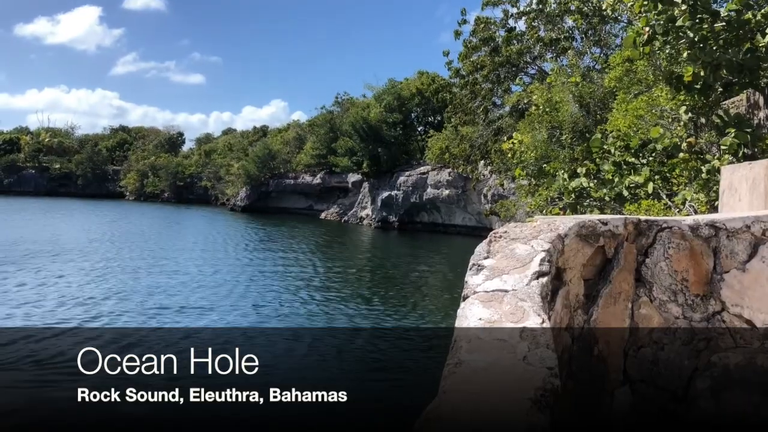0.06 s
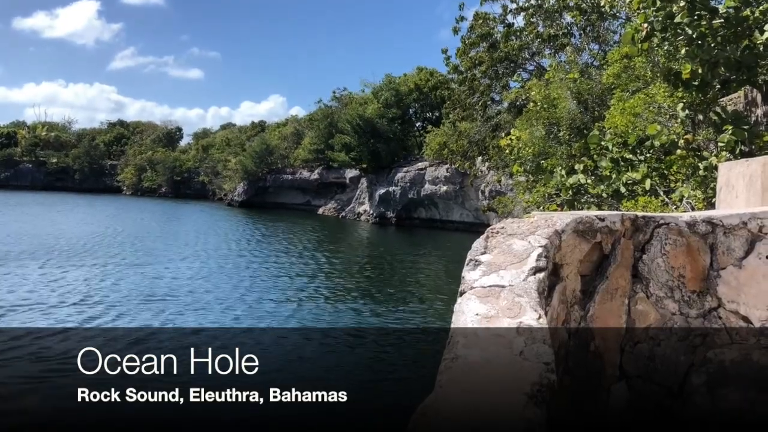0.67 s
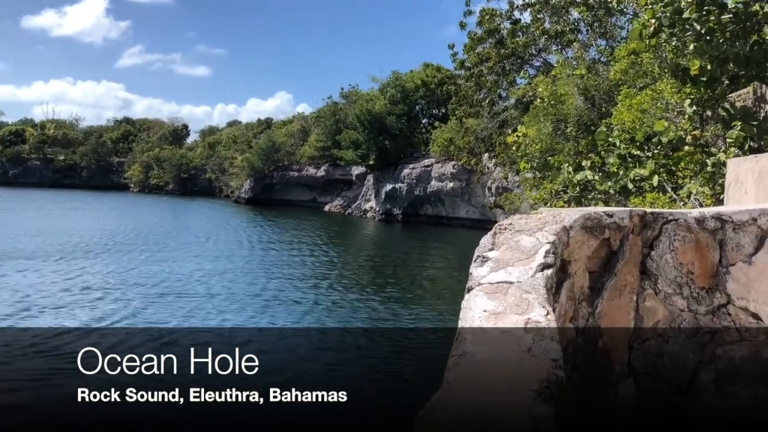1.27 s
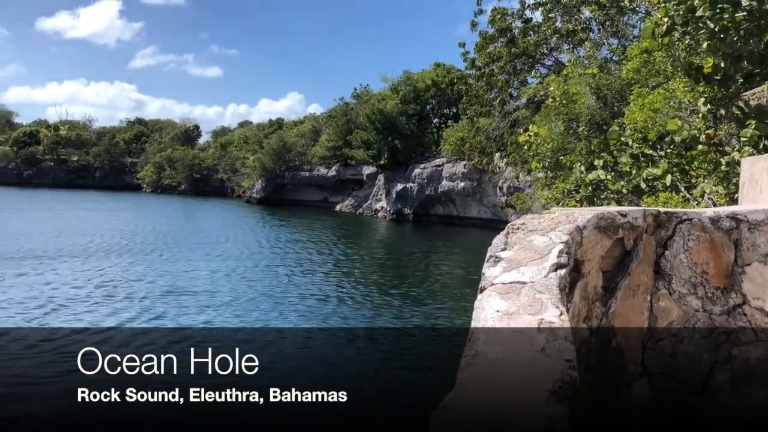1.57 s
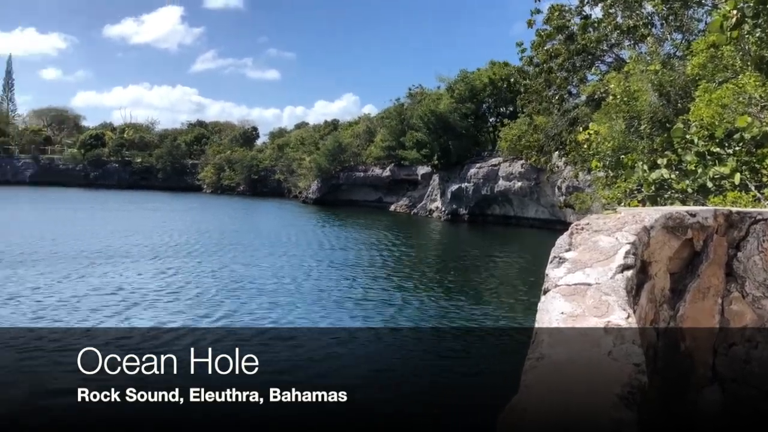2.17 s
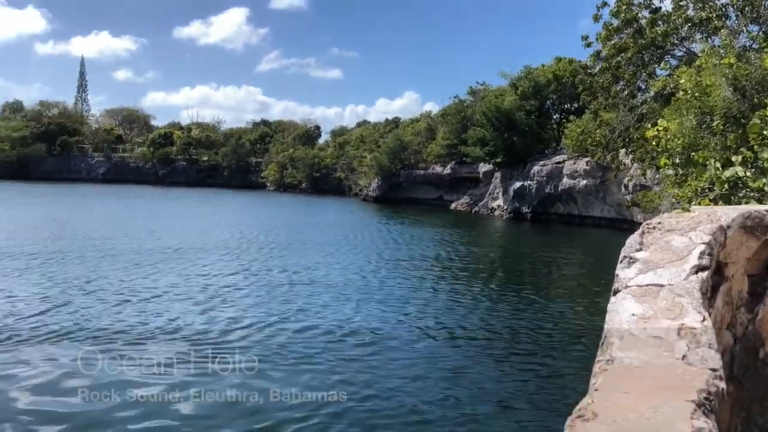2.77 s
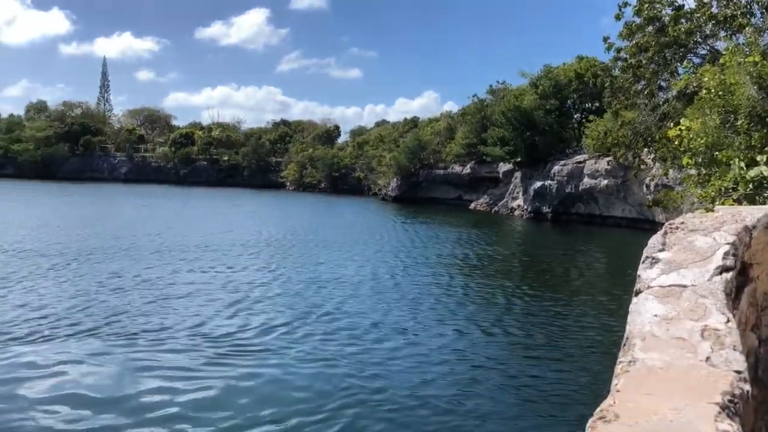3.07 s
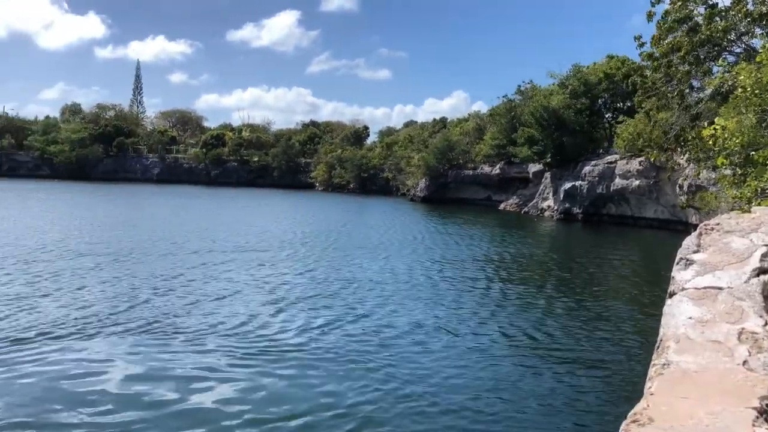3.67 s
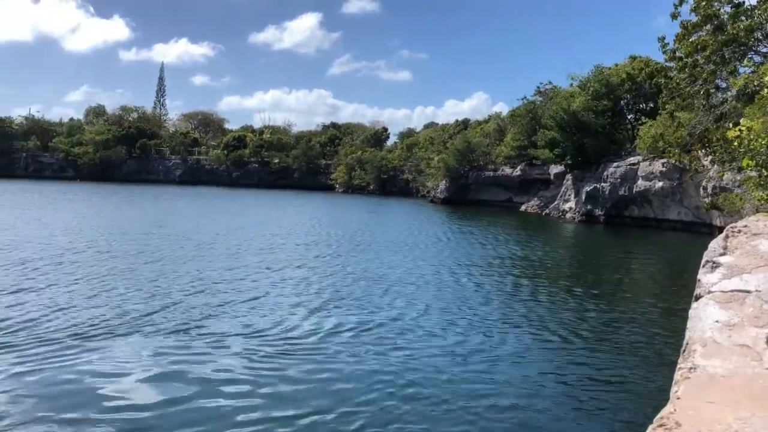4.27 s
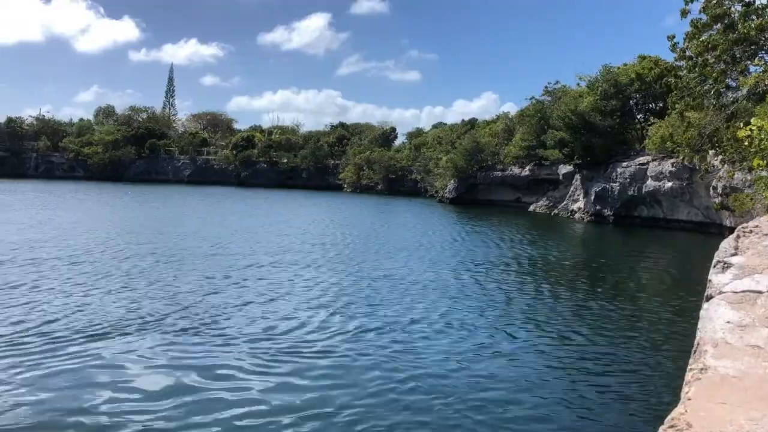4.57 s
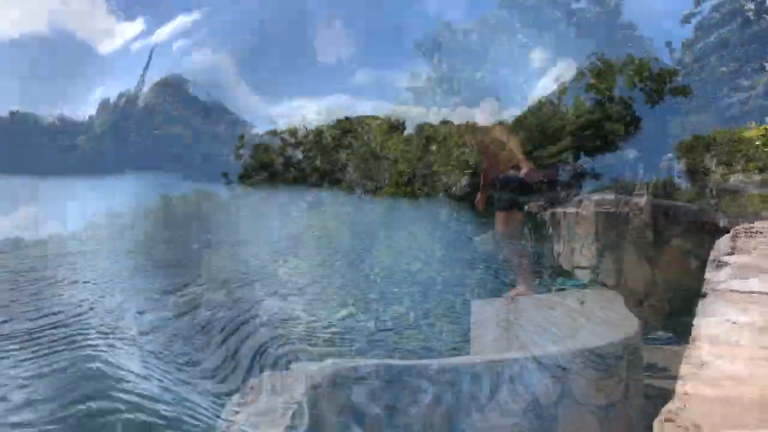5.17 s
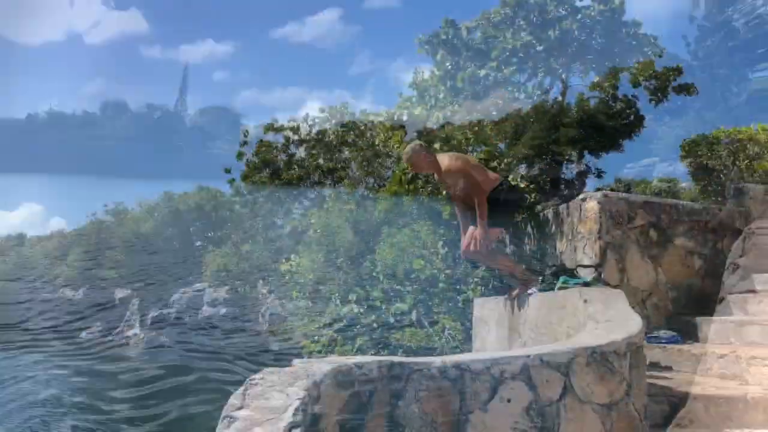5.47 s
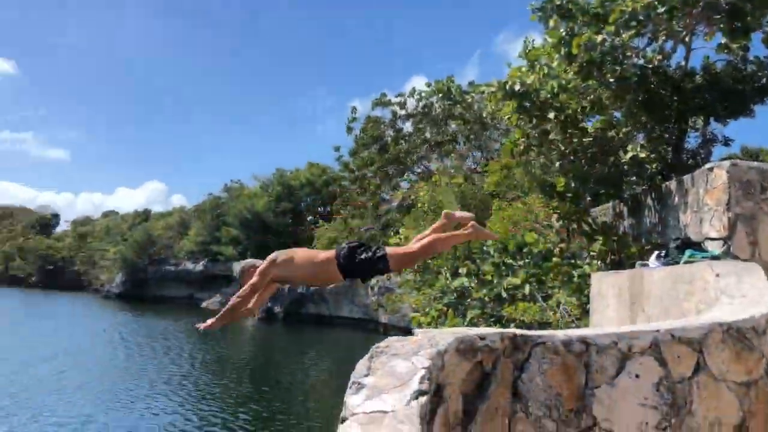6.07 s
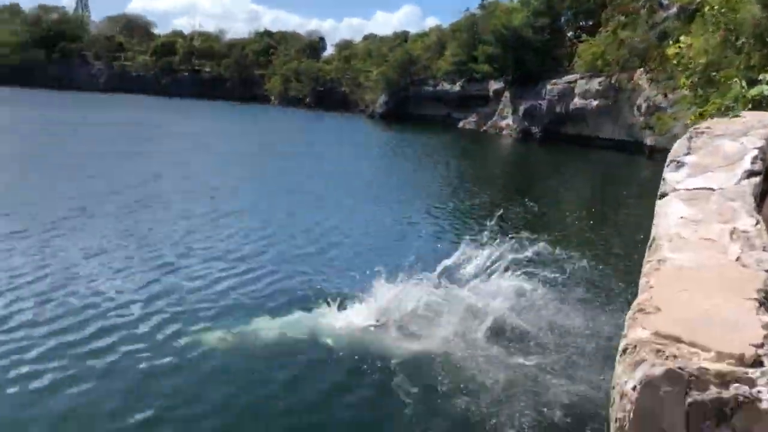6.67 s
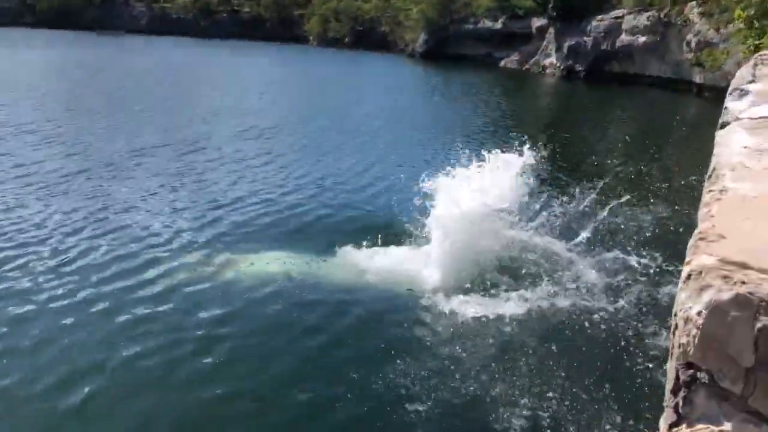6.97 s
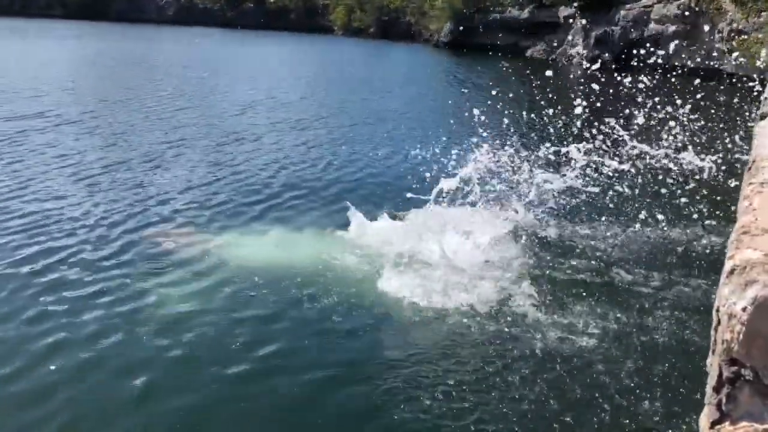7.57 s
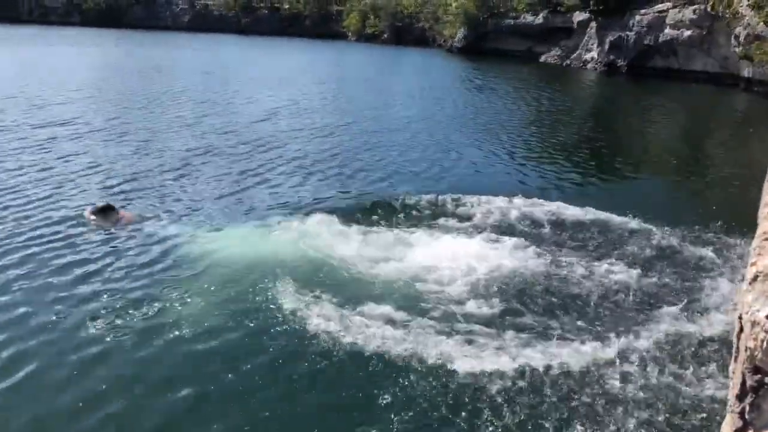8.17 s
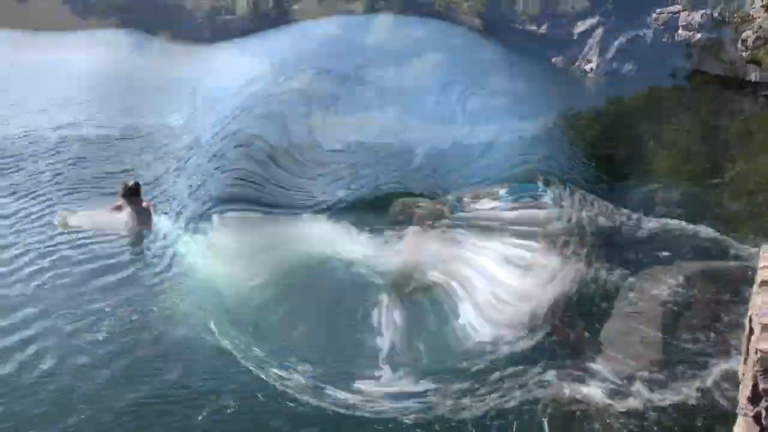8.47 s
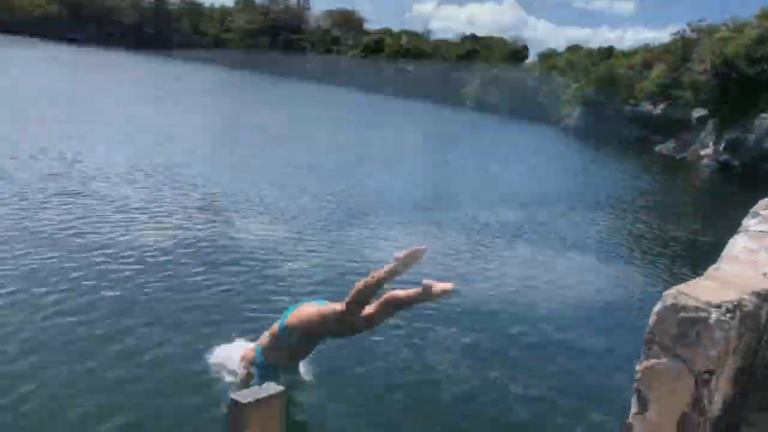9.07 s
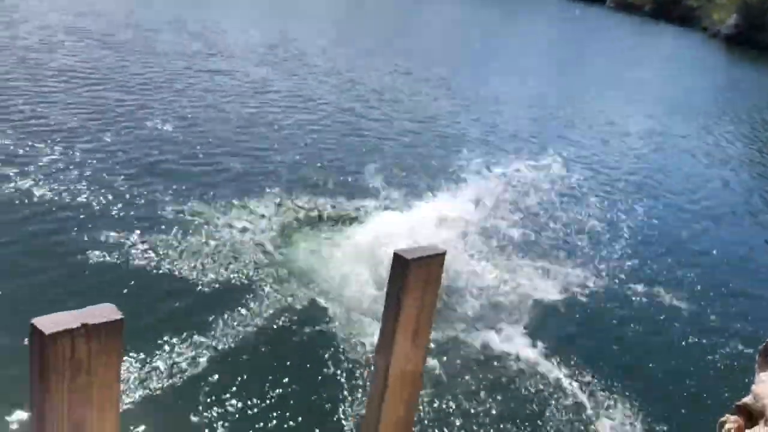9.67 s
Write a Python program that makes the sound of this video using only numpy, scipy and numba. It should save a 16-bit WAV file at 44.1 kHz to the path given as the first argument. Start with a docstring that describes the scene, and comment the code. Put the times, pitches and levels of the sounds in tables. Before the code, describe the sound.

Small waves lap quietly in a light breeze, then two divers plunge into deep water one after the other with loud splashes.

```python
"""In a light breeze, small waves lap and gurgle under the rock rim of a deep pool. The wet rock drips,
and a bird calls once, faintly. Around 6 s, wind thuds on the microphone. At 6.4 s a diver slaps the
surface and drags down a pocket of air that collapses with a thump; the thrown water rains back as
spray and bubbles. At 9.1 s a second diver plunges in. The rock walls echo it all faintly."""
import sys
import numpy as np
from scipy import signal
from scipy.fft import rfft, irfft, next_fast_len
from scipy.io import wavfile
from numba import njit

SR = 44100
rng = np.random.default_rng(int(sys.argv[2]) if len(sys.argv) > 2 else 0)


def master(y):
    """Save y as 16-bit WAV."""
    cut = np.clip(np.atleast_2d(y).T, -1, 1)
    pcm = np.round(cut * 32767)  # scale
    wavfile.write(sys.argv[1], SR, pcm.astype(np.int16))


N = 432621
TIME = np.arange(N) / SR
TOP_HZ = 15850  # the treble is cut above this

# the tone of flying spray: f/Hz, level/dB
SPRAY_TONE = [(900, -13.5), (1650, 2), (2150, 2), (2800, -3), (3800, -1), (7500, -4), (11000, -7.5),
              (15500, -15)]
# the tone of a cloud of bubbles: f/Hz, level/dB
BUBBLE_TONE = [(200, -3.5), (330, -3.5), (500, 2.5), (800, 0), (1300, -0.5), (2000, -10.5), (2700, -15.5),
               (4500, -16)]


def splashes():
    """Spray patters on the surface, drops drive bubbles under, and big pockets of air churn below."""
    # each diver's entry: t/s, lift of the spray at TOP_HZ/dB
    divers = [(6.441, 3.8), (9.082, -1)]
    # the tone of the deep churning: f/Hz, level/dB
    churn_tone = [(22, -36), (45, -5), (85, -1), (170, 4), (260, 2.5), (420, -17), (900, -40)]
    patter = swarm(count=36000, low_hz=1140, high_hz=16800, cycles=1.5, spread_db=2.5, glide=0)
    fizz = swarm(count=6000, low_hz=1363, high_hz=12370, cycles=38, spread_db=3, glide=0.092)
    mist = rng.standard_normal(N)
    clumps = undb(1.56 * wander(350) + wander(50))  # the water comes down in clumps and sheets
    shower = unit((patter + undb(-6) * fizz + undb(4.5) * mist) * clumps)
    bubbles = swarm(count=11000, low_hz=232.9, high_hz=3380, cycles=32.5, spread_db=0.5, glide=0.22)
    bubbles = colour(bubbles, BUBBLE_TONE)
    pockets = swarm(count=2200, low_hz=34.1, high_hz=438, cycles=12, spread_db=1, glide=0.18)
    churn = colour(pockets, churn_tone)
    out = np.zeros(N)
    next_entries = [s for s, _ in divers[1:]] + [np.inf]
    for (entry_s, lift_db), next_s in zip(divers, next_entries):
        spray_gain, bubble_gain, churn_gain = dive_strength(entry_s, next_s)
        spray = colour(shower, [(hz, db + lift_db * hz / TOP_HZ) for hz, db in SPRAY_TONE])
        out += spray_gain * spray + bubble_gain * bubbles + churn_gain * churn
    return out


def dive_strength(entry_s, next_s):
    """How strong spray, bubbles and churn are in one dive: each surge of water swells, then dies away."""
    # surges as the body goes in, the hole closes, spray lands and foam bursts:
    # peak t/s, rise/(dB per s), fall of the spray/(dB per s), spray/dB, bubbles/dB, churn/dB
    surges = [ (6.548, 80, 138, -32, -35, -37), (6.69, 44, 73, -46, -43.5, -40.5),
              (6.878, 275, 385, -59, -34.5, -31), (6.98, 80, 250, -68, -41.5, -64),
              (7.17, 29, 90, -36, -45, -66), (7.77, 27, 44, -36.5, -40.5, -51.5),
              (7.93, 51, 58, -30, -43.5, -62), (8.6, 2, 52, -51, -49.5, -60.5),
              (8.84, 25, 74.5, -57, -56, -67), (9.185, 98, 170, -36.5, -40.5, -46),
              (9.257, 330, 127, -35, -36.5, -45), (9.36, 196, 30, -48.5, -42, -37.5),
              (9.55, 130, 150, -44, -38, -49), (9.71, 220, 320.5, -52, -44.5, -40),
              (9.81, 34, 50, -35.5, -47, -63)]
    linger = np.array([[1], [1.22], [0.66]])  # spray, bubbles, churn: time to die, relative to spray
    lag_s = np.array([[0.025], [0.088]])  # bubbles and churn wait for air to go under
    power = np.zeros((3, N))
    start = int(entry_s * SR)
    for s, rise, fall, *levels_db in surges:
        if entry_s < s < next_s:
            age = TIME[start:] - s
            swell_db = np.minimum(rise * age, -fall * age / linger)
            power[:, start:] += undb(np.array(levels_db)[:, None] + swell_db) ** 2
    fade_in = 1 - np.exp(-((TIME - entry_s) / lag_s) ** 2)
    power[1:] *= fade_in ** 2
    return np.sqrt(power)


def slaps():
    """The surface tears for a few milliseconds: a burst of spray over a hollow smack."""
    # hands, trunk and legs hit the water: t/s, level/dB, length/s, smack over spray/dB
    hits = [(6.437, -27, 0.0096, -15), (6.505, -23.5, .013, 9), (6.542, -27.5, .014, -1.5),
            (9.077, -39, 0.0027, -25), (9.082, -29, 0.0025, -26), (9.176, -32, 0.0089, 4),
            (9.199, -38, 0.013, 0), (9.243, -29, .007, -7)]
    out, hiss, smack = np.zeros(N), noise(SPRAY_TONE), noise(BUBBLE_TONE)
    t = TIME[:SR // 8]
    for s, db, length, smack_db in hits:
        here = slice(int(s * SR), int(s * SR) + len(t))
        rise = np.minimum(t / (0.57 * length), 1)
        fall = np.exp(-np.maximum(t - length, 0) / (0.36 * length))
        add(out, s, undb(db) * rise * fall * unit(hiss[here] + undb(smack_db) * smack[here]))
    return out


def air_thumps():
    """Air trapped behind a diver or under the rim closes off with a short, low thump."""
    # air pockets pinch off and throb: t/s, peak level/dB, f/Hz
    pockets = [(.618, -51, 118), (.767, -51, 175), (.948, -52, 78), (1.335, -52, 228), (1.692, -50.5, 173),
               (1.974, -53, 170), (2.755, -46.5, 159), (6.852, -30.5, 105), (6.876, -23, 135),
               (7.137, -38.5, 245), (7.521, -36, 164), (9.15, -37.5, 196), (9.208, -25.5, 265),
               (9.342, -30, 147), (9.517, -30, 199), (9.692, -35.5, 112), (9.725, -36, 66.4)]
    out, t = np.zeros(N), TIME[:SR // 5]
    for s, db, hz in pockets:
        add(out, s, undb(db) * pulse(t * hz / 0.81) * np.sin(2 * np.pi * hz * t))
    return out


def drops():
    """A lump of water lands with a sharp crack and a short sizzle."""
    # landing lumps, among other sharp ticks: t/s, peak level/dB
    landings = [(0.945, -45.5), (1.3364, -52), (3.2799, -43.5), (3.4613, -42), (4.745, -46), (4.816, -42),
                (5.8609, -39.5), (6.4765, -22), (6.9463, -29), (7.3839, -22), (7.897, -12.5), (7.9604, -15),
                (8.045, -13.5), (8.0899, -19), (8.108, -21), (8.1575, -22.5), (8.1778, -23)]
    crack_tone = [(400, -7), (1300, 6.5), (3000, 0), (6500, 4.5), (15000, -12.5)]
    out, t = np.zeros(N), TIME[:SR // 20]
    snap = np.exp(-((t - .0015) / .0007) ** 2)
    sizzle = undb(-15) * np.exp(-t / .006)
    for s, db in landings:
        crack = (snap + sizzle) * colour(rng.standard_normal(len(t)), crack_tone)
        add(out, s, undb(db) * crack / np.abs(crack).max())
    return out


def plinks():
    """The skin of the water snaps with a tick and rings one bubble, which rises in pitch."""
    # single bubbles burst out: t/s, peak level/dB, f/Hz
    bursts = [(.874, -47.5, 1290), (1.045, -43.5, 1130), (1.336, -51, 588), (1.517, -45.5, 1750),
              (1.653, -36.5, 1294), (1.876, -49, 1390), (2.759, -46.5, 380), (2.847, -50, 466),
              (3.279, -50, 717), (3.673, -42.5, 1160), (3.689, -43.5, 1270), (3.729, -45, 506),
              (3.864, -46, 705), (3.914, -43, 1230), (4.165, -46.5, 1170), (4.594, -47, 1370),
              (4.697, -43.5, 1800), (4.82, -45.5, 1270), (5.351, -52, 990), (7.474, -35, 590),
              (7.629, -35.5, 465), (7.989, -29.5, 1500), (8.047, -24, 1660), (8.44, -34, 1850)]
    # drips fall from the wet rock: t/s, peak level/dB, f/Hz
    drips = [(.7604, -52, 8600), (.8739, -52, 3700), (1.312, -53, 2880), (1.799, -51, 6320),
             (2.494, -46, 4330), (3.462, -47.5, 3180), (3.5844, -43, 5900), (4.815, -46, 5300),
             (5.4806, -49, 3400)]
    out = np.zeros(N)
    for events, cycles, glide, tick_db in [(bursts, 40, 0.14, -29), (drips, 72, 0.059, -5)]:
        s, db, hz = np.transpose(events)
        each = np.ones(len(s))
        bubble = ring(s, hz / (1 + glide / 8), cycles * each, undb(db), glide)
        tick = ring(s, 1.4 * hz, 5 * each, undb(db + tick_db), 0.)
        out += bubble + tick
    return out


def glugs(count=8):
    """Bubbles tear off an air pocket one by one, their size following it as it shrinks or opens."""
    # runs of bubbles: t/s, length/s, first f/Hz, last f/Hz, typical bubble level/dB
    runs = [(0.018, .1, 360, 890, -58), (3.31, 0.042, 1000, 746, -56.5), (3.582, 0.064, 525, 418, -54),
            (3.643, 0.048, 385, 617, -54), (3.792, 0.089, 444, 1020, -51), (4.901, 0.028, 596, 1220, -57),
            (6.459, 0.0076, 1080, 650, -35), (6.555, 0.0199, 456, 650, -31.5),
            (9.195, .028, 894, 432, -30.5), (9.522, .05, 644, 1060, -35), (9.648, 0.045, 544, 326, -38)]
    out, cycles = np.zeros(N), np.full(count, 30.)
    for s, length, first_hz, last_hz, db in runs:
        slip, detune, luck = rng.random((count, 3)).T
        along = (np.arange(count) + slip) / count
        hz = first_hz * (last_hz / first_hz) ** along * (0.961 + 0.1 * detune)
        out += ring(s + length * along, hz, cycles, undb(db) * (.5 + luck), glide=0.048)
    return out


def lapping():
    """Small waves trap air under the rock: rising gurgles and a fine trickle."""
    # the tone of the gurgle: f/Hz, level/dB
    gurgle_tone = [(200, -17), (420, 0.5), (800, 2.5), (1500, -0.5), (2100, -6.5), (3500, -31)]
    gurgle_gain, trickle_gain = wave_strength()
    bubbles = swarm(count=2300, low_hz=331.2, high_hz=2398, cycles=45.4, spread_db=1.5, glide=0.33)
    beads = swarm(count=4500, low_hz=2124, high_hz=14500, cycles=46, spread_db=3, glide=.1)
    trickle = colour(beads, [(2000, -4.5), (3300, 4.5), (7000, -8), (15000, -12.5)])
    gulps = undb(2 * wander(per_s=24))  # a wave breaks up unevenly
    return (gurgle_gain * colour(bubbles, gurgle_tone) + trickle_gain * trickle) * gulps


def wave_strength(rise_share=0.39):
    """How strong gurgle and trickle are: each wave builds quickly at the rock and drains more slowly."""
    # small waves reach the rim: peak t/s, length/s, gurgle/dB, trickle/dB
    waves = [(.02, 0.38, -62.5, -70.5), (0.827, 0.27, -64, -71.5), (1.317, 0.55, -65, -72.5),
             (1.76, 0.29, -63, -78), (2.37, .25, -63, -77), (2.827, 0.74, -67.5, -75),
             (3.582, 0.31, -58, -64.5), (3.834, 0.16, -58, -68.5), (4.13, 0.21, -66.5, -70),
             (4.323, 0.057, -60, -88), (4.667, 0.076, -59.5, -71), (4.818, 0.054, -72, -64),
             (4.963, 0.11, -59, -72), (5.532, 0.28, -67, -78), (5.83, 0.1, -69, -71.5)]
    power = np.zeros((2, N))
    for s, length, *levels_db in waves:
        width_s = length * np.where(TIME < s, rise_share, 1 - rise_share)
        power += undb(levels_db)[:, None] ** 2 * np.exp(-((TIME - s) / width_s) ** 2)
    return np.sqrt(power)


def rock_echo(sound, fade_s=0.6, echo_db=-14, gap_s=.012):
    """The rock walls scatter the sound back as a dull echo that falls 60 dB in fade_s."""
    t = TIME[:SR]
    tail = colour(rng.standard_normal(SR), [(100, -2.5), (1200, -1.5), (5000, -7.5), (15000, -5)])
    tail *= np.exp(-np.log(1000) * t / fade_s) * (t > gap_s)
    return sound + undb(echo_db) * signal.fftconvolve(sound, tail / np.linalg.norm(tail))[:N]


def wind_thuds():
    """Short swirls of wind thud on the microphone, each inside a weaker, longer gust."""
    # the breeze bumps the microphone: t/s, level/dB
    bumps = [(5.911, -47), (5.997, -50), (6.088, -45), (6.269, -58.5), (6.336, -41), (6.409, -50)]
    push = np.zeros(N)
    for s, db in bumps:
        swirl = pulse(np.maximum(TIME - s, 0) / 0.0047)
        gust = undb(-16) * np.exp(-((TIME - s) / 0.07) ** 2)
        push += undb(db) * (swirl + gust)
    return push * noise([(25, -16), (65, -1), (190, -3), (320, -17.5), (700, -45), (2000, -69)])


def bird(s=2.15, hz=4650, db=-62, rise_s=0.021):
    """One faint, raspy call of a bird in the bushes."""
    voice = noise([(hz / 2, -35), (0.66 * hz, -12), (hz, 0), (1.5 * hz, -18), (2 * hz, -45)])
    rasp = undb(2 * wander(per_s=90))
    return undb(db) * pulse(np.maximum(TIME - s, 0) / rise_s) * voice * rasp


def breeze():
    """Breeze in the trees over a low, steady rumble."""
    # the tone of the breeze: f/Hz, level/dB
    breeze_tone = [(15, -40), (25, -32), (43, -3), (64, -1), (134, -2.5), (223, -2.5), (335, -7.5),
                   (476, -10.5), (560, -9.5), (1610, -13.5), (2220, -20), (3520, -19.5), (8830, -28.5),
                   (14400, -41), (16000, -37)]
    # the breeze level over time: t/s, level/dB
    breeze_levels = [(0, -63), (3, -60.5), (4.6, -62.5), (5.3, -63), (6.4, -62)]
    rumble = noise([(25, -45), (42, -22), (52, 9), (62, -16), (110, -7), (400, -70)])
    level_db = np.interp(TIME, *np.transpose(breeze_levels)) + 0.5 * wander(per_s=2.86)
    return undb(level_db) * noise(breeze_tone) + undb(-70) * rumble


def swarm(count, low_hz, high_hz, cycles, spread_db, glide):
    """Bubbles of all sizes ring at random moments, a few much louder than the rest."""
    when, pitch, life, luck = rng.random((count, 4)).T
    hz = low_hz * (high_hz / low_hz) ** pitch
    extra_db = spread_db * np.minimum(-np.log(1 - luck), 5)
    gain = hz * undb(extra_db)  # high bubbles are sparser and shorter; this evens out the power per Hz
    return unit(ring(when * N / SR, hz, cycles * (.5 + life), gain, float(glide)))


@njit
def ring(times, hz, cycles, gain, glide):
    """Each bubble is a sine that dies by 60 dB in so many cycles and rises as it nears the surface."""
    out = np.zeros(N)
    for k in range(len(times)):
        start, length = int(times[k] * SR), int(cycles[k] * SR / hz[k]) + 2
        step = 2 * np.pi * hz[k] / SR
        wave = gain[k] + 0j
        turn = np.exp(1j * step - np.log(1000) / length)  # moves the wave on one sample and fades it
        bend = np.exp(1j * step * glide / length)  # a glide of 0.1 ends 10 % higher
        for i in range(start, min(start + length, N)):
            wave *= turn
            turn *= bend
            out[i] += wave.imag
    return out


def undb(db):
    """Turn decibels into a gain."""
    return 10 ** (np.asarray(db) / 20)


def unit(x):
    """Scale to an average (rms) level of 1."""
    return x / np.sqrt(np.mean(x ** 2))


def colour(x, tone):
    """Filter x by a curve of (f/Hz, level/dB) points, then scale it to level 1."""
    hz, db = np.transpose(tone)
    size = next_fast_len(len(x))
    bins = np.maximum(np.fft.rfftfreq(size, 1 / SR), 1)
    gain = undb(np.interp(np.log(bins), np.log(hz), db))
    return unit(irfft(rfft(x, size) * gain, size)[:len(x)])


def noise(tone):
    """Steady noise with the given tone."""
    return colour(rng.standard_normal(N), tone)


def wander(per_s):
    """Random values, so many a second, joined by straight lines."""
    return np.interp(TIME * per_s, np.arange(4096), rng.standard_normal(4096))


def pulse(age):
    """A quick rise to 1 at age 1, then a slower fall."""
    return age * np.exp(1 - age)


def add(out, s, sound):
    """Mix a sound in at s seconds."""
    start = max(int(s * SR), 0)
    out[start:start + len(sound)] += sound[:N - start]


def scene():
    """The water and the bird echo between the rocks, with the wind around them."""
    water = lapping() + plinks() + glugs() + splashes() + slaps() + drops() + air_thumps()
    return (rock_echo(water + bird()) + wind_thuds() + breeze())[None]


def record(dry):
    """The recorder cuts the deepest bass and the highest treble."""
    dry = signal.sosfilt(signal.butter(4, 33, "high", fs=SR, output="sos"), dry)
    return signal.sosfilt(signal.ellip(10, .2, 70, TOP_HZ, fs=SR, output="sos"), dry)


dry = scene()
out = record(dry)
master(out)
```